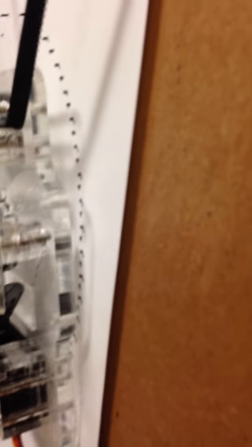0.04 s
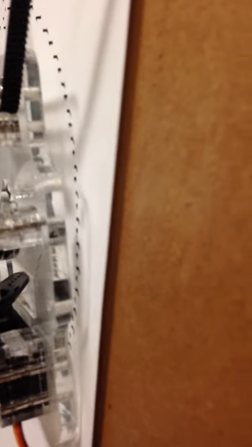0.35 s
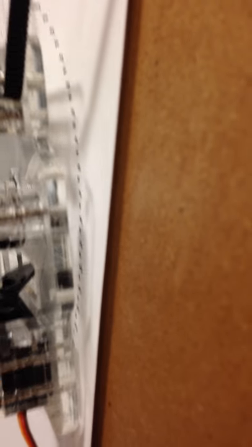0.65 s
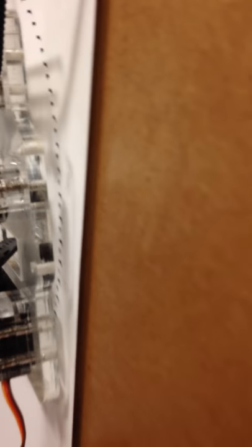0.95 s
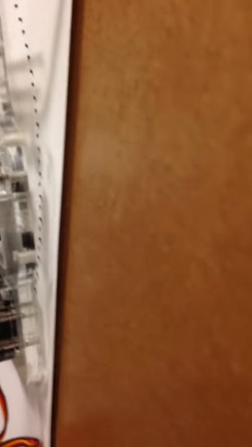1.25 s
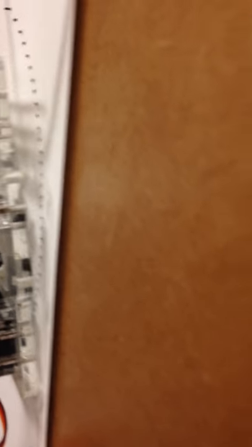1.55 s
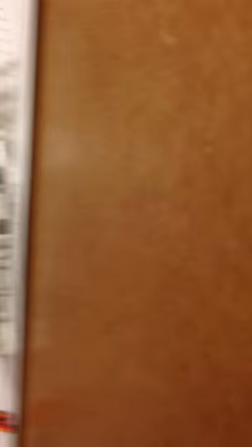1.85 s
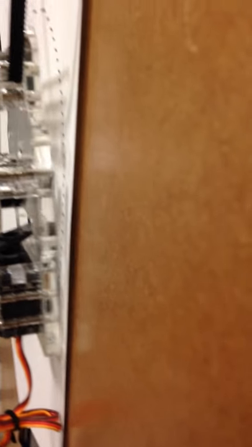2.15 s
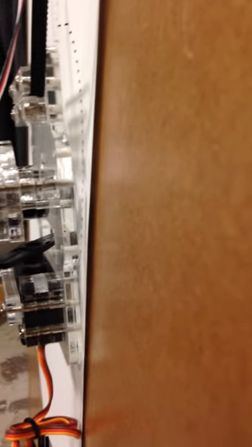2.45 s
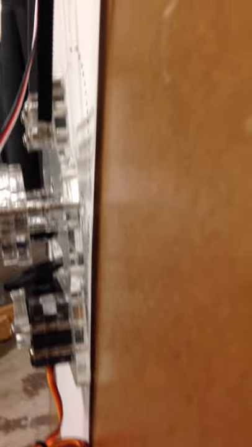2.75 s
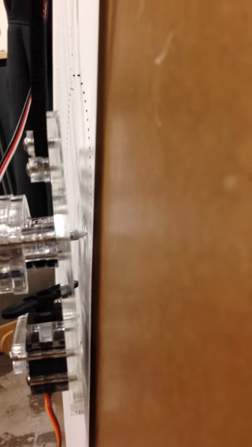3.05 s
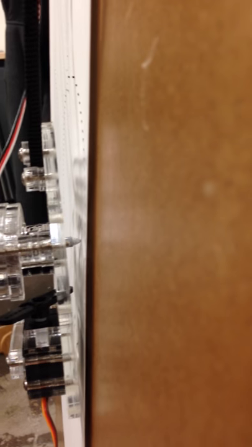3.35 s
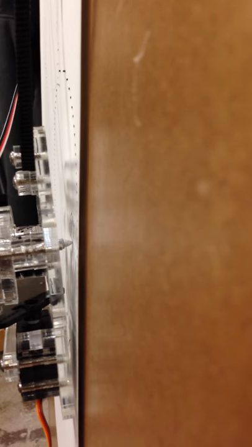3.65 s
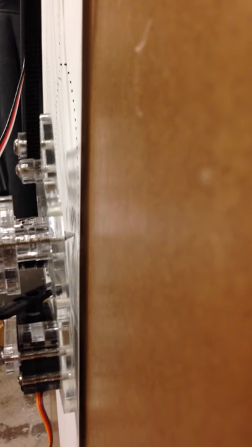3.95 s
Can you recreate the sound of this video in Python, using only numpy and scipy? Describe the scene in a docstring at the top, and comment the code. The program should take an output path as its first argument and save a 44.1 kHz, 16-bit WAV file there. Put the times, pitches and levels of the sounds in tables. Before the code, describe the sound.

A plotter's small motors hum and whir in shifting pitches, with faint rustling and ticks.

```python
"""In a quiet room, close by, two small stepper motors drive a plotter carriage over paper.
The motors drone through the plastic frame, and each kind of move adds its own whirring chord.
Their uneven steps shake the frame, the casings and the gears. The carriage rustles and scrapes
as it drags, plastic parts tick, and the room rumbles faintly behind it all."""
import sys
import numpy as np
from scipy import signal
from scipy.fft import rfft, irfft, next_fast_len
from scipy.io import wavfile
from scipy.ndimage import map_coordinates

SR = 44100
rng = np.random.default_rng(int(sys.argv[2]) if len(sys.argv) > 2 else 0)


def master_out(mix):
    """Clip the mix to full scale and print it as 16-bit PCM to the path in sys.argv[1]."""
    frames = np.transpose(np.atleast_2d(mix))
    ceiling = np.clip(frames, -1, 1)
    pcm = np.round(ceiling * 32767).astype(np.int16)
    wavfile.write(sys.argv[1], SR, pcm)


N = 176400

STEP_HZ, CYCLE_HZ = 112.94, 28.34  # how often a motor steps, and how often its step pattern repeats
LOW_HZ, MID_HZ, HIGH_HZ = 253.6, 291.1, 313  # the frame's three drones
RAMP_S = 0.036  # time a move takes to fade in or out


def amp(db):
    """Decibels to gain."""
    return 10 ** (np.asarray(db) / 20)


def unit(x):
    """Scaled to rms 1."""
    return x / np.sqrt(np.mean(x ** 2) + 1e-20)


def clock():
    """Time of every sample."""
    return np.arange(N) / SR


def curves(rows):
    """One value per sample for each column after the time."""
    s, *cols = np.transpose(rows)
    return [np.interp(clock(), s, c) for c in cols]


def wobble(rate):
    """A smooth random curve, rate knots a second."""
    coarse = map_coordinates(rng.standard_normal(1024), [clock()[::40] * rate + 2], mode="mirror")
    return np.interp(clock(), clock()[::40], coarse)


def filtered(x, response):
    """x times a complex response of frequency."""
    m = next_fast_len(N + SR // 2)
    return irfft(rfft(x, m) * response(np.fft.rfftfreq(m, 1 / SR)), m)[:N]


def coloured(x, points):
    """x shaped by (Hz, dB) points, at rms 1."""
    f, db = np.transpose(points)
    return unit(filtered(x, lambda hz: amp(np.interp(np.log(hz + 1), np.log(f + 1), db))))


def phase_of(hz, stray, rate):
    """Running phase of a slightly unsteady tone; stray in radians."""
    return 2 * np.pi * (np.cumsum(hz * np.ones(N)) / SR + rng.random()) + stray * wobble(rate)


def resonance(f, hz, width):
    """Response of one resonance at the frequencies f."""
    return 1j * f * width / (hz * hz - f * f + 1j * f * width)


def gate(moves):
    """Gain that ramps up and down with each move."""
    t = clock()
    return sum(amp(db) * np.clip(np.minimum(t - start, end - t) / RAMP_S + .5, 0, 1)
               for start, end, db in moves)


# tone colour of the room's rumble: f/Hz, relative level/dB
ROOM_COLOUR = [(20, -1), (90, -5.5), (160, 1.5), (400, -14), (2000, -31), (12000, -35.5)]

def background(hum_hz=58.6):
    """The room rumbles faintly, with a weak low hum."""
    hum = np.sqrt(2) * np.sin(phase_of(hum_hz, stray=0.66, rate=6.6))
    rumble = coloured(rng.standard_normal(N), ROOM_COLOUR)
    return amp(-62) * rumble + amp(-71) * hum


# plastic ticks: t/s, relative level/dB
PLASTIC_TICKS = [(.695, -55), (1.237, -52), (1.616, -49.5), (1.862, -49), (3.095, -54.5), (3.135, -51),
                 (3.31, -50.5), (3.416, -51), (3.452, -60), (3.956, -48.5)]
# their tone colour: f/Hz, relative level/dB
PLASTIC_COLOUR = [(1500, -2), (5500, -3), (11500, -3), (14000, -16)]
# a sharp click: t/s, starting level/dB
DRY_CLICKS = [(2.394, -51.5)]

def ticking(fade_s=0.022):
    """Plastic ticks and one bright click: bursts of noise that fall 60 dB in `fade_s`."""
    t = clock()
    def bursts(rows):
        return sum((t >= s) * amp(db - 60 * np.clip((t - s) / fade_s, 0, 2)) for s, db in rows)
    ticks = amp(-3) * bursts(PLASTIC_TICKS) * coloured(rng.standard_normal(N), PLASTIC_COLOUR)
    return ticks + bursts(DRY_CLICKS) * rng.standard_normal(N)


# short scuffs of the carriage: t/s, relative level/dB
CARRIAGE_SCUFFS = [(.172, -61), (.72, -78), (.755, -70), (1.408, -64.5), (1.492, -66), (1.567, -59.5),
                   (2.388, -69), (2.448, -68.5), (2.518, -67.5), (2.577, -66.5), (2.64, -70.5),
                   (2.708, -67.5), (2.925, -69.5), (3.04, -61.5), (3.164, -58), (3.232, -67), (3.345, -62),
                   (3.38, -64), (3.522, -61.5), (3.557, -63), (3.626, -59.5), (3.682, -62)]

def scuffing(width_s):
    """A loudness curve that swells briefly at each scuff."""
    t = clock()
    return sum(amp(db) * np.exp(-.5 * ((t - s) / width_s) ** 2) for s, db in CARRIAGE_SCUFFS)


# rustle on the paper: t/s, relative level/dB
PAPER_LEVELS = [(0, -67.5), (.5, -76), (.74, -69.5), (1.05, -77.5), (1.42, -66), (1.645, -72), (1.82, -67),
                (2.22, -76), (2.95, -70.5), (3.34, -65), (3.6, -65.5), (3.76, -70.5), (4, -68.5)]
# its tone colour: f/Hz, relative level/dB
PAPER_COLOUR = [(1500, -21), (2500, -4.5), (3200, 0), (4400, -7), (5750, -3), (6600, -7), (7600, -4),
                (9200, -7), (11700, -7.5), (15000, -28)]
# plastic scrapes: start t/s, end t/s, level/dB
PLASTIC_SCRAPES = [(.03, .19, -72.5), (.68, .79, -69), (1.21, 1.3, -68), (1.37, 1.58, -66.5),
                   (1.74, 1.88, -79)]
# their tone colour: f/Hz, relative level/dB
SCRAPING_COLOUR = [(2500, -14), (4700, -10), (5600, -5), (6500, -9.5), (12000, -12.5)]

def carriage(throb, grains_per_s=480):
    """The carriage drags over paper with a gritty hiss and scrapes, shaken by the motors."""
    shake = throb + 0.23 * np.sin(phase_of(LOW_HZ, stray=0.29, rate=13))
    grains = (rng.random(N) < grains_per_s / SR) * rng.uniform(-0.8, 1, N)
    grit = amp(-3) * coloured(grains, PAPER_COLOUR)
    hiss = amp(-1.5) * coloured(rng.standard_normal(N), PAPER_COLOUR)
    sliding = shake * amp(curves(PAPER_LEVELS)[0] + 1.7 * wobble(29.93))
    drag = np.hypot(sliding, scuffing(width_s=0.0094))
    scrapes = gate(PLASTIC_SCRAPES) * coloured(rng.standard_normal(N), SCRAPING_COLOUR)
    return drag * (hiss + grit) + shake * scrapes


def step_kicks(scatter_steps=.25):
    """Each step of the two motors is a tiny push or pull, a little early or late."""
    timing, push = rng.standard_normal((1200, 2)).T
    steps = np.arange(len(timing)) / 2 + scatter_steps * timing
    at = (steps / STEP_HZ * SR).astype(int)
    inside = (at >= 0) & (at < N)
    return np.bincount(at[inside], np.sign(push[inside]), N)


# where the frame rings: f/Hz, width/Hz, relative level/dB
FRAME_RINGS = [(175, 20, -4), (255, 48.5, 0), (295.7, 46, -1.5), (400, 80, -16), (592, 63, -13.5)]

def frame_thrum(kicks):
    """The steps knock on the plastic frame and make it ring low."""
    def frame(f):
        rings = sum((-1) ** k * amp(db) * resonance(f, hz, width)
                    for k, (hz, width, db) in enumerate(FRAME_RINGS))
        return rings * f ** 4 / (f ** 4 + 150 ** 4) / (1 + (f / 900) ** 4)  # keep mostly 150-900 Hz
    return amp(-47.5) * unit(filtered(kicks, frame))


# buzz of the casings: t/s, relative level/dB
CASING_LEVELS = [(0.05, -56.5), (0.6, -60.5), (1.1, -58), (1.5, -56), (1.8, -59), (2.5, -59.5), (2.85, -57),
                 (4, -58)]
# its tone colour: f/Hz, relative level/dB
CASING_COLOUR = [(240, -35), (360, -8.5), (430, -4), (545, -8.5), (605, 2), (680, -10), (950, -8),
                 (1200, -10), (1600, -25), (3000, -45.5)]
# rasp of the gears: t/s, relative level/dB
GEAR_LEVELS = [(0.05, -65.5), (0.95, -65.5), (1.55, -63.5), (1.7, -65.0), (2.6, -67.5), (3.0, -63),
               (3.5, -62.5), (4, -64)]
# its tone colour: f/Hz, relative level/dB
GEAR_COLOUR = [(900, -13.5), (1400, 0.5), (1620, -3.5), (2050, -1.5), (2600, -12.5), (3400, -16),
               (6000, -26)]

def casings_and_gears(kicks, fade_s=0.3):
    """The steps blur into a chatter that buzzes in the casings and rasps in the gears."""
    ring = rng.standard_normal(SR // 4) * amp(-60 * clock()[:SR // 4] / fade_s)
    chatter = unit(signal.fftconvolve(kicks, ring)[:N]) + rng.standard_normal(N)
    buzz = amp(curves(CASING_LEVELS)[0] + 3.5) * coloured(chatter, CASING_COLOUR)
    shifted = np.roll(chatter, SR)  # so the rasp does not copy the buzz
    rasp = amp(curves(GEAR_LEVELS)[0] + 2.5) * coloured(shifted, GEAR_COLOUR)
    return buzz + rasp


def motor_chord(moves, tones, stray, flutter_db, rough_hz=1580):
    """Motor tones sound while a move lasts; uneven steps roughen the high ones most."""
    def tone(hz):
        rough = .5 * hz / rough_hz
        flicker = 1 + rough * wobble(70)
        phase = phase_of(hz, stray, rate=16) + rough * wobble(110)
        return unit(flicker * np.sin(phase))
    return gate(moves) * sum(amp(db + flutter_db * wobble(24.9)) * tone(hz) for hz, db in tones)


# turns: start t/s, end t/s, relative level/dB
TURN_TIMES = [(1.03, 1.19, -5), (2.24, 2.7, -3)]
# their tones: f/Hz, relative level/dB
TURN_TONES = [(360, -58), (979, -62.5)]

def turning(kicks, judder):
    """In a turn the motors sing two tones and their steps make a grainy whirr."""
    grainy = unit(filtered(kicks, lambda f: resonance(f, hz=1050, width=280) ** 2))
    whirr = amp(-61) * gate(TURN_TIMES) * judder * grainy
    return whirr + motor_chord(TURN_TIMES, TURN_TONES, stray=0.68, flutter_db=6)


# slow moves: start t/s, end t/s, relative level/dB
SLOW_TIMES = [(.08, .58, -5), (.78, 1.0, -4), (2.07, 2.32, -5), (2.75, 3.1, -2.5)]
# their tones: f/Hz, relative level/dB
SLOW_TONES = [(159, -59.5), (216, -58), (234, -67.5), (535, -56.5), (596, -58), (923, -64)]
# moves under load: start t/s, end t/s, relative level/dB
LOADED_TIMES = [(1.37, 1.63, -2.5), (3.11, 3.69, -0.5)]
# their tones: f/Hz, relative level/dB
LOADED_TONES = [(113, -64), (196.5, -55), (226, -53), (265.5, -49.5), (481, -67), (510, -58.5), (594, -56),
                (622.5, -54.5), (765, -66.5), (1222, -73), (1340, -68.5), (1453, -62), (1847, -68.5),
                (1960, -73)]
# fast moves: start t/s, end t/s, relative level/dB
FAST_TIMES = [(.595, .775, -1), (1.68, 2.06, -2), (3.8, 4.05, -0.5)]
# their tones: multiple of CYCLE_HZ, relative level/dB
FAST_MULTIPLES = [(4, -61.5), (7, -46), (8, -50.5), (10, -49.5), (14, -62.5), (15, -58), (19, -56.5),
                  (22, -62.5), (23, -58.5), (49, -68.5), (52.5, -65)]

def motor_moves():
    """The motors whirr with one chord each for slow, loaded and fast moves."""
    slow = motor_chord(SLOW_TIMES, SLOW_TONES, stray=0.72, flutter_db=2.5)
    loaded = motor_chord(LOADED_TIMES, LOADED_TONES, stray=0.41, flutter_db=2)
    fast_tones = [(k * CYCLE_HZ, db) for k, db in FAST_MULTIPLES]
    fast = motor_chord(FAST_TIMES, fast_tones, stray=0.16, flutter_db=2)
    return slow + loaded + fast


# the frame's low, middle and high drones: t/s, level/dB
LOW_LEVELS = [(0, -50), (0.3, -57), (0.53, -61), (0.77, -44), (0.87, -68), (1.1, -56), (1.24, -37),
              (1.32, -52), (1.41, -38), (1.59, -43.5), (1.66, -48.5), (2.0, -44.5), (2.1, -62),
              (2.3, -60.5), (2.75, -50.5), (2.88, -45), (3.35, -40.5), (3.68, -43.5), (3.76, -46.5),
              (4, -47)]
MID_LEVELS = [(0, -37.5), (0.1, -54), (0.43, -42), (0.6, -73), (0.9, -44), (1.03, -59), (1.2, -47),
              (1.9, -58.5), (2.2, -47), (2.45, -48), (2.83, -45), (3.0, -49.0), (4, -51.5)]
HIGH_LEVELS = [(0, -46.5), (0.4, -51.5), (0.5, -47), (0.95, -48), (1.08, -62), (1.55, -54.5), (1.7, -46),
               (2.3, -47.5), (2.48, -67), (2.85, -43.5), (3.25, -68), (3.7, -55), (4, -44.5)]

def motor_drones(wander_hz=1.334):
    """The motors drone through the frame in three wavering tones; scuffs swell the lowest."""
    def tone(hz, levels, stray, flutter_db, swell=0):
        phase = phase_of(hz + wander_hz * wobble(3.7), stray, rate=30)
        flutter = amp(flutter_db * wobble(25.986))  # from the uneven steps
        return (amp(curves(levels)[0]) + swell) * unit(flutter * np.sin(phase))
    jolts = amp(20) * scuffing(width_s=0.0099)
    low = tone(LOW_HZ, LOW_LEVELS, stray=0.33, flutter_db=2, swell=jolts)
    mid = tone(MID_HZ, MID_LEVELS, stray=0.63, flutter_db=0)
    high = tone(HIGH_HZ, HIGH_LEVELS, stray=0.39, flutter_db=1.9)
    return low + mid + high


def scene():
    """The plotter in its room, in mono; the repeating step pattern makes it throb."""
    throb = 1 + 0.17 * np.sin(phase_of(CYCLE_HZ, stray=0.93, rate=6.8))
    motors = throb * motor_drones() + motor_moves()
    kicks = step_kicks()
    judder = throb * amp(1.23 * wobble(45))
    steps = throb * frame_thrum(kicks) + judder * casings_and_gears(kicks)
    return (background() + ticking() + carriage(throb) + steps + turning(kicks, judder) + motors)[None]


def record(dry):
    """The recorder keeps nothing above 15250 Hz."""
    return filtered(dry[0], lambda hz: hz < 15250)[None]


dry = scene()
out = record(dry)
master_out(out)
```